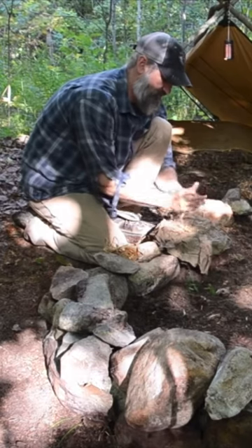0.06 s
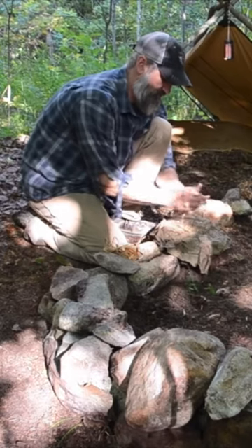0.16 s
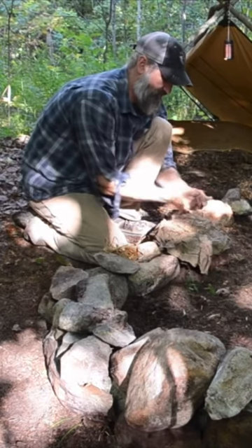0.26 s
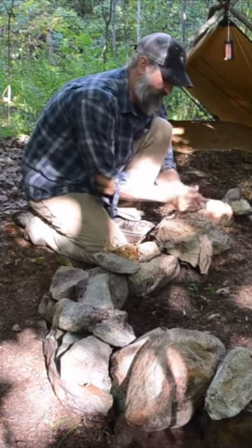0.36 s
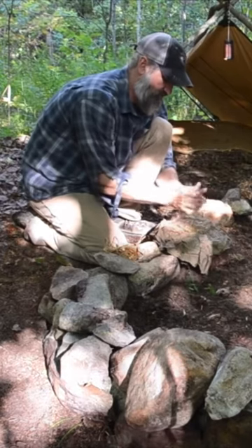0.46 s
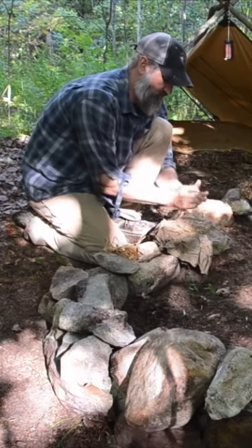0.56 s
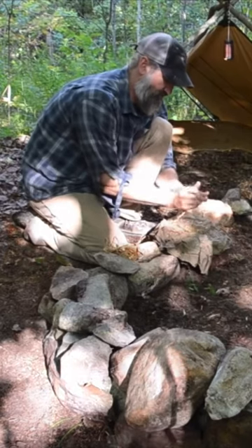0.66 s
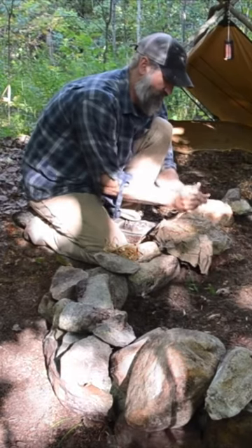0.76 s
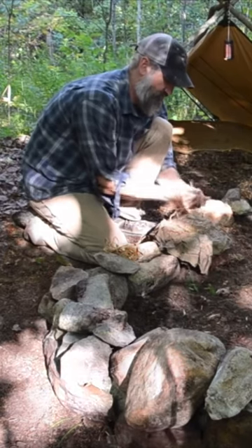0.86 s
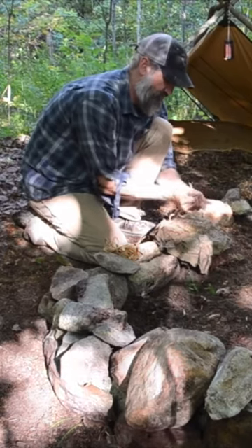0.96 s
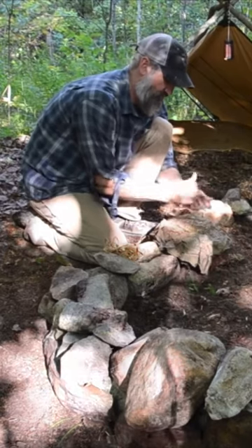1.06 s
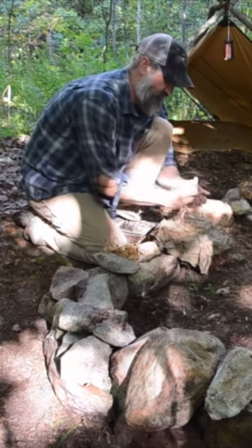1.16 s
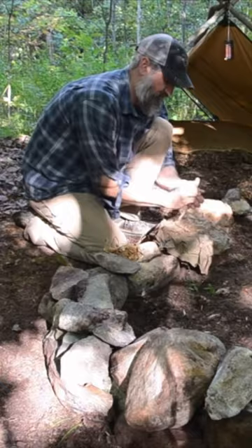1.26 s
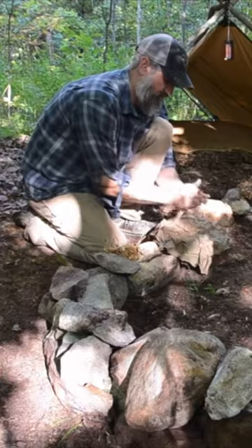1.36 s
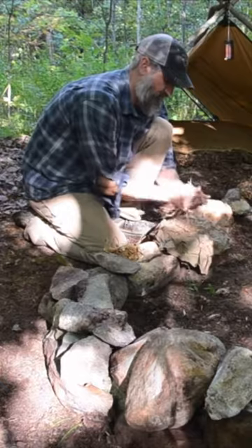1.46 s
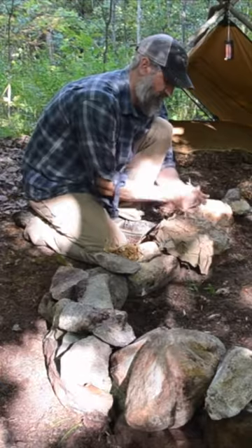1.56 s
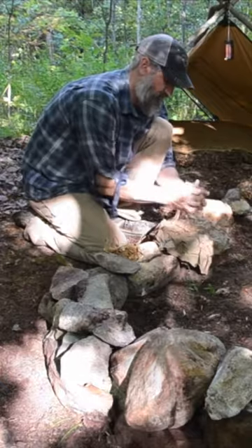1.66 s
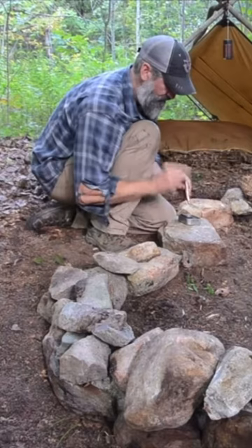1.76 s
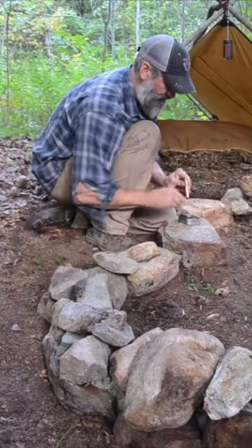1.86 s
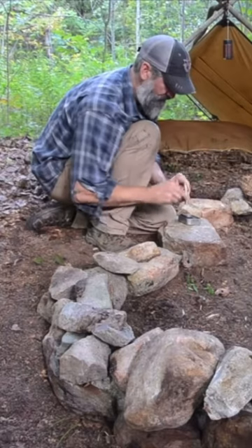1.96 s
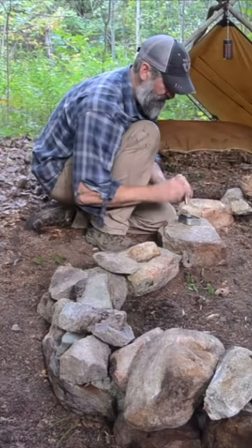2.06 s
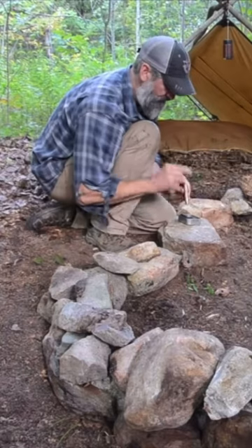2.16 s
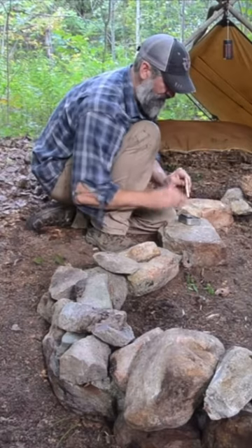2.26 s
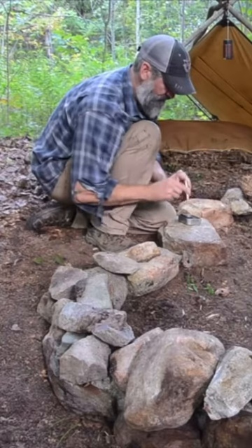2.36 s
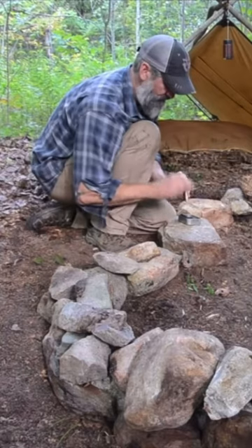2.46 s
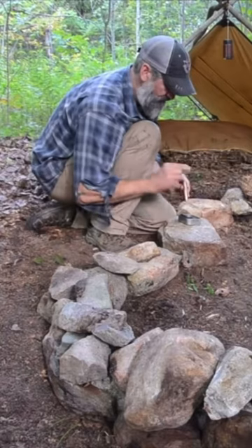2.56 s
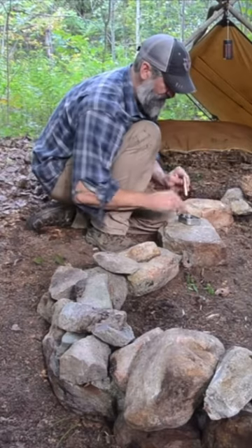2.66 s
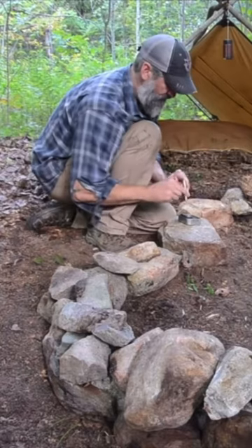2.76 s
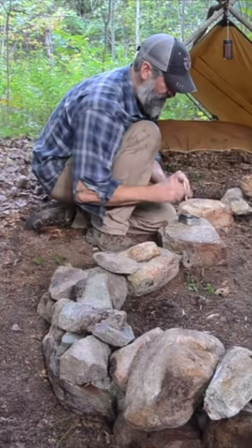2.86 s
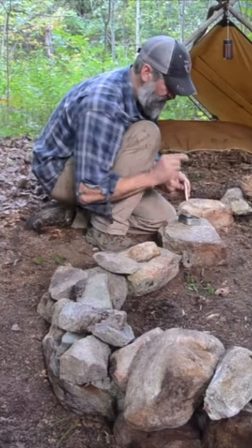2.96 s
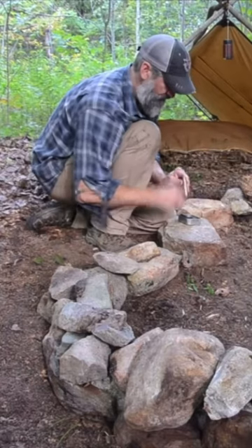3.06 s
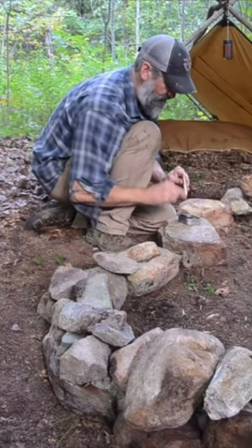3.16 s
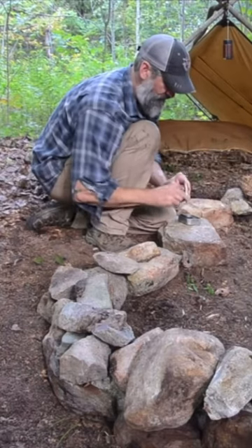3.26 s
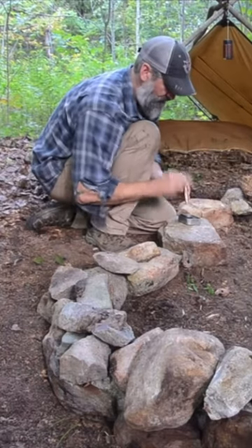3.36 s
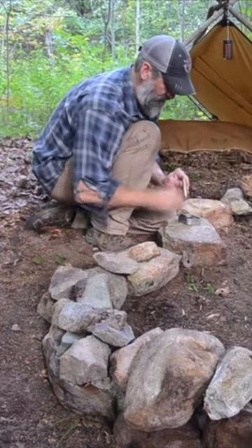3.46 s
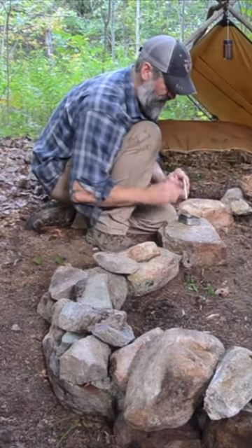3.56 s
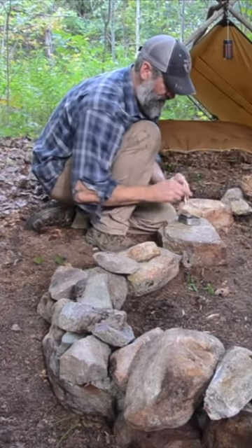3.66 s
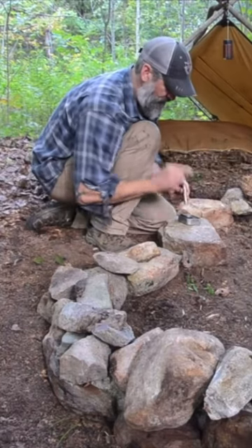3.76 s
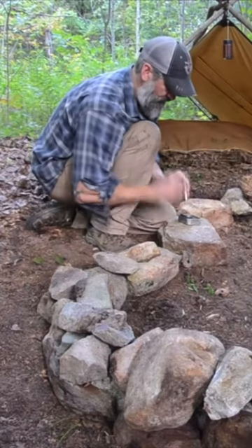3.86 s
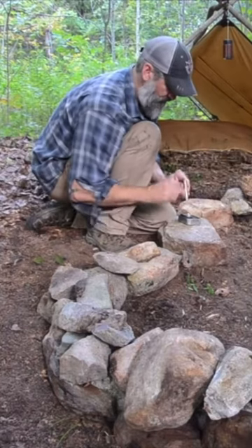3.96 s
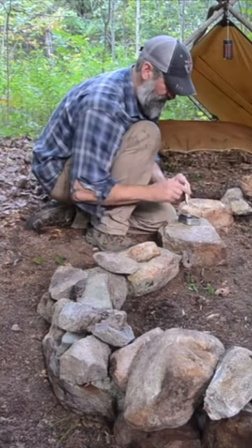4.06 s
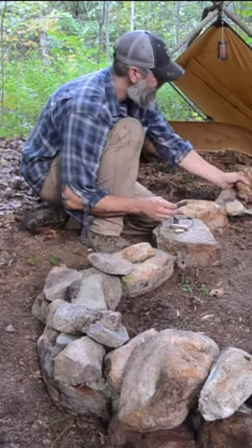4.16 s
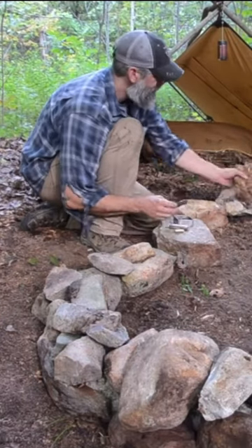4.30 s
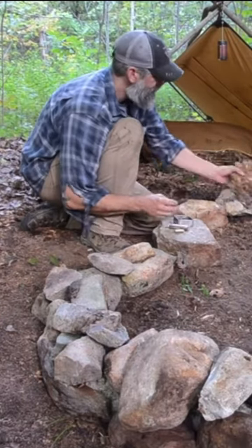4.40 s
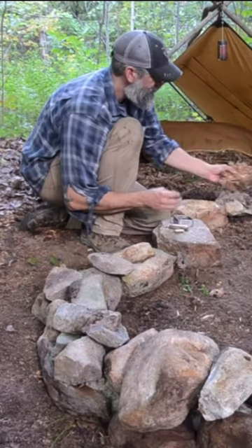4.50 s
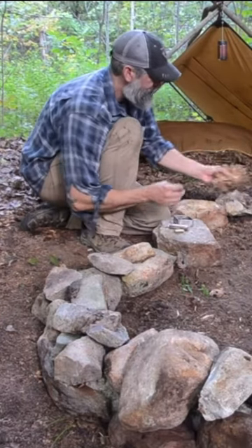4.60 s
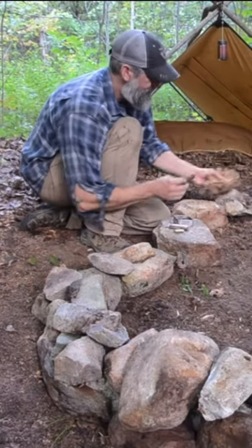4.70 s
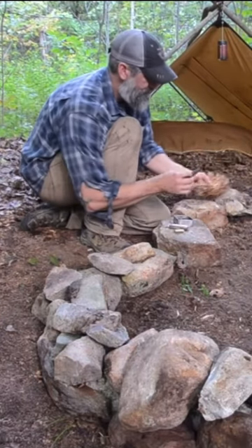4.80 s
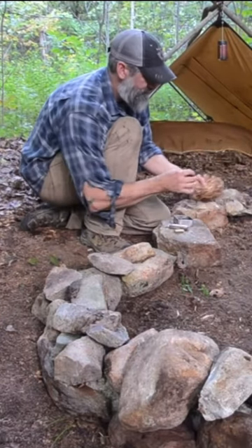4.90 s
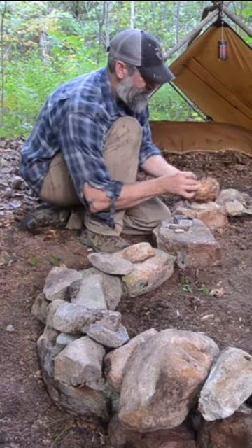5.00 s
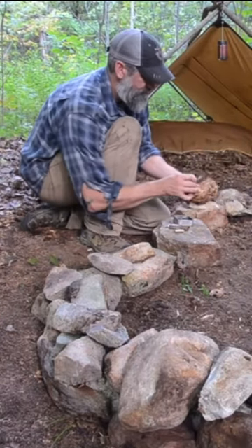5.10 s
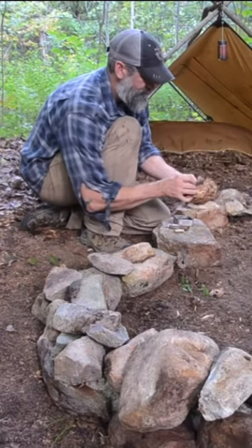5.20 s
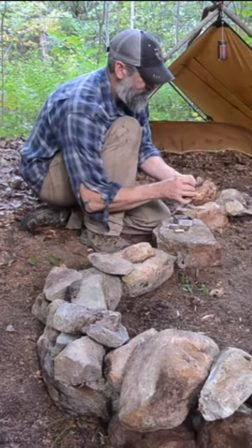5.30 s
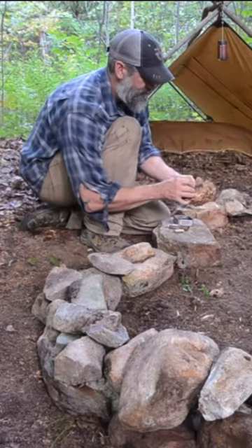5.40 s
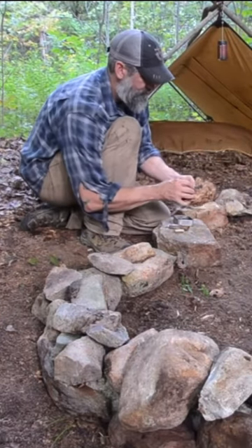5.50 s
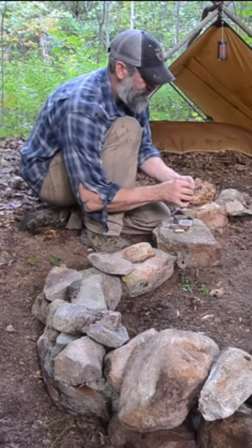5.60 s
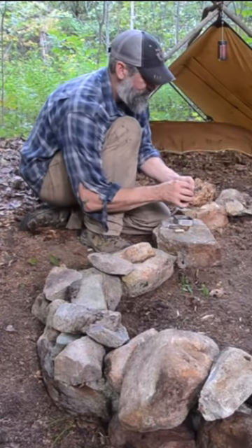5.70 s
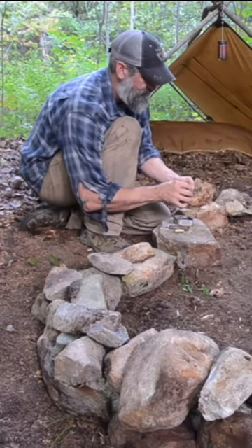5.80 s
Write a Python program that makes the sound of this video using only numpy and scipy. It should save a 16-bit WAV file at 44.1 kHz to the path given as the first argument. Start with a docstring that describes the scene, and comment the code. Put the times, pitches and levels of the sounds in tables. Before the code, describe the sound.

Mono microphone outdoors, three joined stretches of differing soft hiss. First come small dry snaps and rustles of grass with thin bird chirps; next, six hard, very short flint-and-steel scrapes in steady rhythm, far louder than everything else, with only a slight airy tail from the trees; finally, quieter hiss, a barely audible pulsing cricket and tiny low wind bumps, with almost no handling sound.

```python
"""Flint and steel in a wood

A steel striker glances six times off a flint: each blow cracks as a short push through a fixed spectrum,
grinds along the edge as random clicks, snags as single clicks, rings the steel and returns a tail from the trees.
Filtered noise gives far traffic and leaves, stepping in level and colour twice, and gusts at the microphone.
Faint bending whistles (birds), crackling clicks (dry tinder in the hands) and a pulsed tone (cricket) lie around it."""
import sys
import numpy as np
from scipy import signal
from scipy.fft import rfft, irfft, next_fast_len
from scipy.io import wavfile
from scipy.ndimage import uniform_filter1d

SR = 44100
rng = np.random.default_rng(int(sys.argv[2]) if len(sys.argv) > 2 else 0)


def master(y):
    """Save y as 16-bit WAV."""
    cut = np.clip(np.atleast_2d(y).T, -1, 1)
    pcm = np.round(cut * 32767)  # scale
    wavfile.write(sys.argv[1], SR, pcm.astype(np.int16))


N = 257544
T = np.arange(N) / SR  # s

# background stretches: (start [s], hiss level [dB], hiss drift [dB/s], calm wind level [dB])
STRETCHES = [(0, -43, 0.64, -62), (1.702, -39, -.5, -62.5), (4.165, -44, -0.85, -71)]
# hiss colour, one relative spectrum per stretch: (frequency [Hz], density [dB per Hz])
HISS_COLOURS = [
    [(24, -35), (40, -10), (99, -6.5), (130, -9), (171, -8), (220, -4), (392, -3.5), (444, -3.5), (503, -1),
     (918, -0.5), (1440, -4.5), (3650, -12), (16000, -51)],
    [(32, -37), (55, -10.5), (118, -8), (257, -2.5), (359, -2.5), (1260, 0.5), (1760, -6), (3500, -8),
     (5000, -16.5), (5770, -21), (6340, -23.5), (8230, -31), (16000, -51)],
    [(24, -45), (40, -18.5), (150, -10), (430, -7), (965, -2), (1500, -7.5), (2300, -16.5), (3300, -17),
     (5100, -26), (6300, -33.5), (10000, -43.5), (15500, -51)],
]
# wind gusts on the microphone: (arrival [s], hold [s], level [dB])
GUSTS = [(.17, 0.043, -52.5), (.8, .3, -62.5), (1.705, 0.63, -49), (2.72, .06, -61), (3.3, .1, -61),
         (4.45, .08, -61), (4.8, .05, -61.5)]
GUST_RISE_DB_PER_S, GUST_FALL_DB_PER_S = 122, 56
# bird whistles: (start [s], length [s], first pitch [Hz], top pitch [Hz], last pitch [Hz],
# top reached at [share 0-1], loudest at [share 0-1], level [dB], end re loudest [dB])
WHISTLES = [(.678, .15, 6150, 7420, 7250, 0.31, 0.07, -53, -31),
            (.725, .19, 2386, 2510, 2133, .35, .22, -45, -11),
            (1.28, 0.147, 2610, 2920, 2910, .7, 0.8, -51, -5),
            (1.5, 0.21, 2820, 2830, 2520, .1, 0.3, -53.5, -5),
            (1.565, .045, 7300, 8600, 8600, .95, .45, -72, -9),
            (1.671, 0.026, 7200, 7500, 7500, .7, .55, -63, -4)]
CALL_START_DB = -14  # re loudest moment
CRICKET_HZ, CRICKET_RATE_HZ = 2810, 32.2
CRICKET_START_DB, CRICKET_FADE_DB_PER_S, CRICKET_WAVER_DB = -62, 0.6, 0.6
# tinder rustles: (start [s], length [s], level [dB], centre [Hz], fine top re body [dB])
RUSTLES = [(0.236, 0.086, -40.5, 1780, -29), (0.836, 0.084, -44.5, 1910, -30), (1.22, .04, -59, 3000, -16),
           (1.38, 0.1, -50, 2500, -24), (1.506, 0.043, -52, 2500, -25), (1.71, 0.039, -51, 2500, -28),
           (4.11, 0.076, -56, 3300, -20)]
# single stalks snapping: (time [s], peak [dB], centre [Hz])
SNAPS = [(0.253, -42, 2500), (0.269, -32, 1500), (.282, -31, 1580), (.729, -50, 4970), (.872, -29.5, 2400),
         (0.875, -46, 3800), (0.899, -33, 2190), (1.409, -34, 3000), (1.523, -53, 8500),
         (1.55, -28.5, 2110)]
# strikes: (time [s], blow [dB], hardness as treble corner [Hz], grind length [s], grind at start [dB],
# grind at end [dB], pitch favoured by the grip and the spot on the flint [Hz])
STRIKES = [(1.8633, 1.5, 9000, 0.033, -36, -44.5, 3300), (2.2718, 2.8, 12000, 0.018, -30, -47, 2480),
           (2.6714, 0, 6000, 0.015, -31.5, -36.5, 3600), (3.1172, .5, 4500, 0.012, -30, -36.5, 3620),
           (3.53, 2, 11000, 0.0106, -32, -35, 3260), (3.9289, 2.6, 11000, 0.012, -31, -40, 3460)]
# steel snagging on the flint edge: (time [s], level [dB])
SNAGS = [(1.8726, -11), (1.8733, -15), (1.885, -17), (1.8880, -6), (2.2739, -8.5), (2.6829, -11.5),
         (3.1272, -13.5), (3.532, -11), (3.5386, -13), (3.5414, -10.5), (3.932, -11)]
# relative spectrum of a blow: (frequency [Hz], level [dB])
CRACK_SPECTRUM = [(200, -30.5), (700, -28.5), (1400, -13), (2300, -8.5), (3200, -1), (4300, -4),
                  (5200, -9.5), (6600, -13), (8200, -27.5), (11000, -39), (15000, -64), (16900, -73)]
# relative spectrum of grinding and snags: (frequency [Hz], level [dB])
GRIND_SPECTRUM = [(500, -41), (1000, -18), (1300, -7.5), (1900, -13.5), (2460, 1.5), (3300, -4), (4520, 0),
                  (5400, -11.5), (6680, -20), (8000, -19.5), (11500, -34), (13800, -31), (14500, -46),
                  (15300, -73)]
# ringing modes of the steel: (frequency [Hz], level [dB], t60 [s])
STEEL_MODES = [(2520, -45, 0.021), (3220, -15, 0.0039), (4200, -21, 0.018), (4560, -20, 0.0017),
               (5930, -32, .035), (7830, -32, .015)]
TREES_GAIN_DB, TREES_T60_S = -46, 0.24
# microphone housing notches: (frequency [Hz], width [Hz], depth [0-1])
NOTCHES = [(5750, 370, 1), (6950, 220, 0.7)]
TOP_HZ = 17050  # stopband edge of the final low-pass


def undb(db):
    """Linear gain of a level in dB."""
    return 10 ** (np.asarray(db, float) / 20)


def unit(x):
    """Scale to rms 1."""
    return x / np.sqrt(np.mean(x ** 2))


def gains(points, size):
    """Linear gain of (Hz, dB) points on the bins of a transform."""
    hz, db = np.transpose(points)
    bin_hz = np.arange(size // 2 + 1) * SR / size
    return undb(np.interp(np.log(bin_hz + 1), np.log(hz), db))


def causal(points, size=1024):
    """Minimum-phase response with this spectrum, by folding the cepstrum; peak 1."""
    cepstrum = irfft(np.log(gains(points, size)))
    cepstrum[1:size // 2] *= 2
    cepstrum[size // 2 + 1:] = 0
    response = irfft(np.exp(rfft(cepstrum)))[:size // 2]
    return response / np.abs(response).max()


def band(x, hz, width_hz):
    """Single resonance, peak gain 1."""
    return signal.lfilter(*signal.iirpeak(hz, hz / width_hz, SR), x)


def bandpass(x, low_hz, high_hz):
    """Third-order Butterworth band-pass."""
    return signal.sosfilt(signal.butter(3, [low_hz, high_hz], "bandpass", fs=SR, output="sos"), x)


def walk(rate_hz):
    """Random levels drawn at this rate, smoothed by two moving averages one step long."""
    step = int(SR / rate_hz)
    held = np.repeat(rng.standard_normal(N // step + 1), step)
    return uniform_filter1d(uniform_filter1d(held, step), step)[:N]


def grit(rate_hz, scatter_db, cap=3.6):
    """Random clicks of either sign, long-tailed but bounded sizes, rms 1."""
    chance, sign, spread = rng.random((3, N))
    size = np.minimum(-np.log(spread + 1e-9), cap)
    return unit((chance < rate_hz / SR) * np.sign(sign - 0.5) * undb(scatter_db * size))


def stretch():
    """Columns of STRETCHES as they hold at each moment."""
    rows = np.array(STRETCHES, float)
    return rows[np.searchsorted(rows[1:, 0], T, side="right")].T


def hiss():
    """Far traffic and leaves: coloured noise, colour and level jumping between stretches."""
    out, size = np.zeros(N), next_fast_len(N)
    for row, colour in zip(STRETCHES, HISS_COLOURS):
        spectrum = rfft(rng.standard_normal(size)) * gains(colour, size)
        noise = unit(irfft(spectrum, size)[:N])
        out = np.where(T >= row[0], noise, out)
    start_s, level_db, drift_db_per_s, _ = stretch()
    return out * undb(level_db + drift_db_per_s * (T - start_s) + 0.5 * walk(6.22))


def wind():
    """Low-frequency thump on the microphone: gusts rise fast from the calm, hold and die away."""
    level_db = stretch()[3]
    for start_s, hold_s, gust_db in GUSTS:
        rise_db = GUST_RISE_DB_PER_S * np.clip(start_s - T, 0, None)
        fall_db = GUST_FALL_DB_PER_S * np.clip(T - start_s - hold_s, 0, None)
        level_db = np.maximum(level_db, gust_db - rise_db - fall_db)
    rumble = unit(bandpass(rng.standard_normal(N), 10, 38))
    return rumble * undb(level_db + 2.0 * walk(10))


def cricket():
    """Wing tone in uneven pulses over a noise blur of echoes and far neighbours; last stretch only."""
    beat = np.cumsum(CRICKET_RATE_HZ * (1 + 0.03 * walk(5))) / SR
    pulse = np.clip(np.sin(2 * np.pi * beat) + 0.4, 0, None) * undb(1.1 * walk(30))
    tone_hz = CRICKET_HZ * (1 + 0.01195 * walk(120))
    tone = np.sin(2 * np.pi * np.cumsum(tone_hz) / SR)
    blur = unit(band(band(rng.standard_normal(N), CRICKET_HZ, 200), CRICKET_HZ, 200))
    since_s = T - STRETCHES[-1][0]
    level_db = CRICKET_START_DB - CRICKET_FADE_DB_PER_S * since_s + CRICKET_WAVER_DB * walk(4)
    return (since_s > 0) * (unit(pulse * tone) + undb(-1.5) * blur) * undb(level_db)


def birds():
    """Near-sine whistles bending up to a top pitch and sagging, wavering, smeared by the trees."""
    out = np.zeros(N)
    for start_s, length_s, first_hz, top_hz, last_hz, top_at, loud_at, db, end_db in WHISTLES:
        along = np.clip((T - start_s) / length_s, 0, 1)
        top_at, loud_at = np.clip([top_at, loud_at], 0.05, 0.95)
        gate = np.clip(np.minimum(along, 1 - along) * length_s / 0.008, 0, 1)  # 8 ms ramps
        bend = np.interp(along, [0, top_at, 1], [-1, 0, 1])
        drop_hz = top_hz - np.where(bend < 0, first_hz, last_hz)
        hz = (top_hz - bend ** 2 * drop_hz) * (1 + 0.022 * walk(200))
        level_db = db + np.interp(along, [0, loud_at, 1], [CALL_START_DB, 0, end_db])
        tone = np.sqrt(2) * np.sin(2 * np.pi * np.cumsum(hz) / SR)
        out += gate * undb(level_db + 3 * walk(90.3)) * tone
    t = T[:SR // 4]
    tail = rng.standard_normal(len(t)) * 1000.0 ** (-t / 0.27)  # t60 0.27 s
    return out + undb(-33.5) * signal.fftconvolve(out, tail)[:N]


def tinder():
    """Dry stalks: dense click bursts with a mid body and fine top; snaps are resonant noise bursts."""
    out = np.zeros(N)
    grains = grit(4000, 2.5) * undb(4.0 * walk(110))
    fine = unit(bandpass(grains, 5500, 12500))
    for start_s, length_s, db, hz, fine_db in RUSTLES:
        shape = np.sin(np.pi * np.clip((T - start_s) / length_s, 0, 1))
        body = unit(band(band(grains, hz, 1800), hz, 2300))
        out += undb(db) * shape * (body + undb(fine_db) * fine)
    t = T[:SR // 50]
    for start_s, db, hz in SNAPS:
        snap = rng.standard_normal(len(t)) * np.exp(-t / 0.00089)
        for width in (0.9, 1.3, 1.6):  # re centre
            snap = band(snap, hz, width * hz)
        first = int(start_s * SR)
        out[first:first + len(t)] += undb(db) * snap / np.abs(snap).max()
    return out


def steel_ring():
    """Decaying modes of a small bar, kept between about 1.7 and 14 kHz; modes take a moment to build up."""
    t = T[:SR // 8]
    ring = sum(undb(db) * np.sin(2 * np.pi * hz * t) * 1000.0 ** (-t / t60_s)
               for hz, db, t60_s in STEEL_MODES)
    return bandpass(ring * (1 - np.exp(-t / 0.0002)), 1700, 14300)


def tree_tail():
    """Diffuse decaying noise scattered by trunks and ground; bark and leaves favour the treble."""
    t = T[:SR // 3]
    tail = rng.standard_normal(len(t)) * 1000.0 ** (-t / TREES_T60_S) * np.clip(t / 0.0062, 0, 1)
    return tail + undb(2.5) * band(band(tail, 11400, 10000), 11000, 13400)


def striker():
    """Blows, grinding and snags push the same steel and flint; the trees answer."""
    blows, rub, grains = np.zeros(N), np.zeros(N), grit(6000, 0.9)
    for start_s, blow_db, hard_hz, length_s, grind_start_db, grind_end_db, spot_hz in STRIKES:
        # softer contact: longer push, less treble
        push = np.exp(-2 * np.pi * hard_hz * T[:64])
        first = int(start_s * SR)
        blows[first:first + 64] -= undb(blow_db) * push / push.sum()
        along = (T - start_s - 0.0006) / length_s  # grinding starts 0.6 ms after the blow
        # contact eases off over the last 2 ms as the steel leaves the edge
        touch = (along > 0) * np.clip((1 - along) * length_s / 0.002, 0, 1)
        grind_db = grind_start_db + (grind_end_db - grind_start_db) * np.clip(along, 0, 1)
        rub += (grains + 0.94 * band(grains, spot_hz, 820)) * touch * undb(grind_db)
    for start_s, db in SNAGS:
        rub[int(start_s * SR)] -= undb(db)
    direct = signal.fftconvolve(blows, causal(CRACK_SPECTRUM))[:N]
    direct += signal.fftconvolve(rub, causal(GRIND_SPECTRUM))[:N]
    direct += signal.fftconvolve(blows + 0.71 * rub, steel_ring())[:N]
    return direct + undb(TREES_GAIN_DB) * signal.fftconvolve(direct, tree_tail())[:N]


def scene():
    """Sum of all sources, one channel."""
    return (hiss() + wind() + cricket() + birds() + tinder() + striker())[None]


def record(dry):
    """Housing notches the treble, input rounds the loudest peaks, low-pass cuts the top."""
    x = dry[0]
    for hz, width_hz, depth in NOTCHES:
        x = x - np.clip(depth, 0, 1) * band(x, hz, width_hz)
    x = x / (1 + np.abs(x / 0.85) ** 5) ** (1 / 5)  # ceiling 0.85
    return signal.sosfilt(signal.cheby2(16, 85, TOP_HZ, fs=SR, output="sos"), x)[None]


dry = scene()
out = record(dry)
master(out)
```